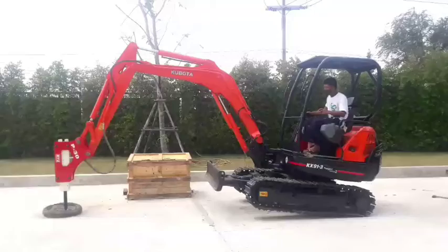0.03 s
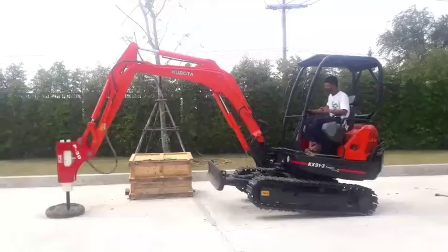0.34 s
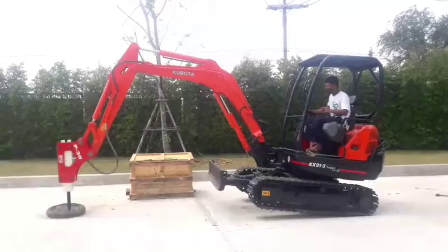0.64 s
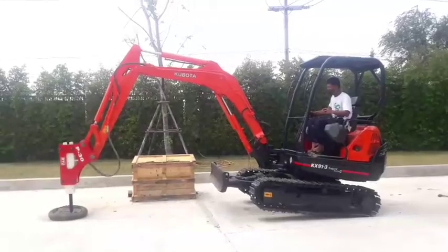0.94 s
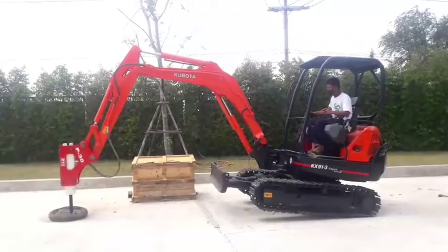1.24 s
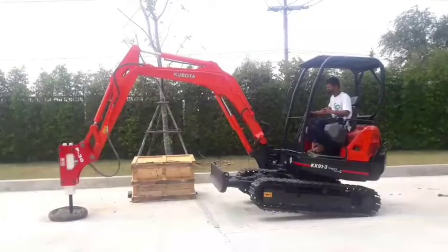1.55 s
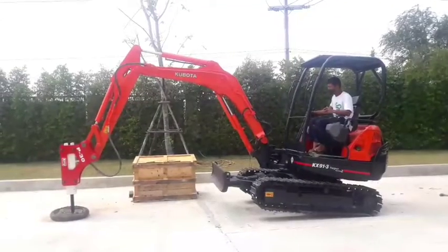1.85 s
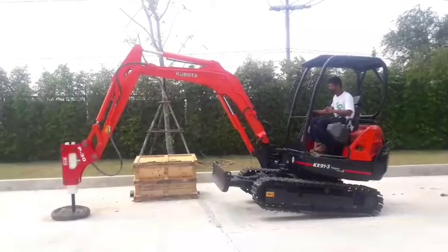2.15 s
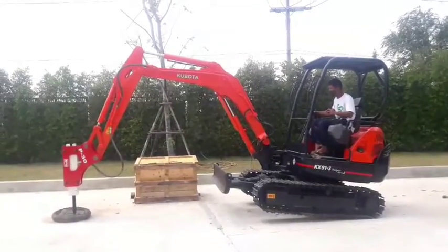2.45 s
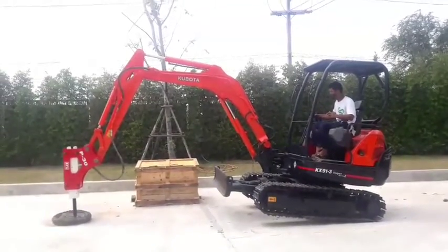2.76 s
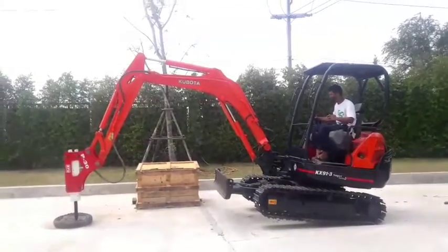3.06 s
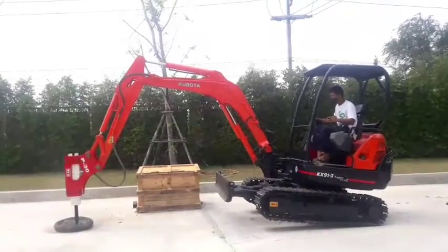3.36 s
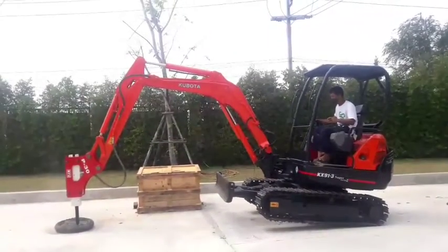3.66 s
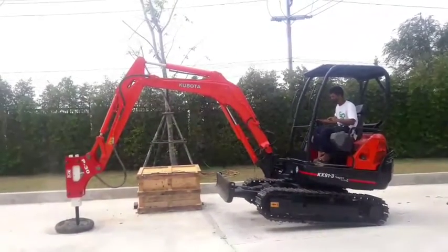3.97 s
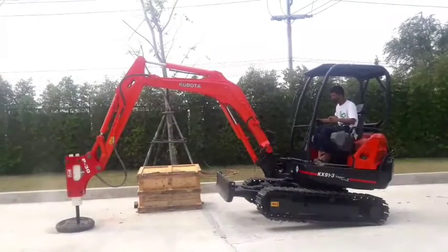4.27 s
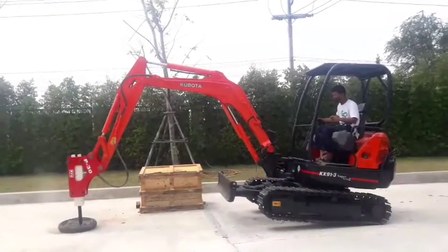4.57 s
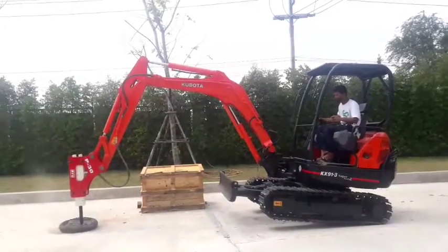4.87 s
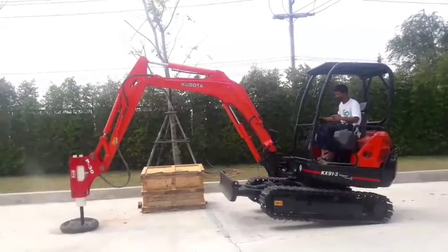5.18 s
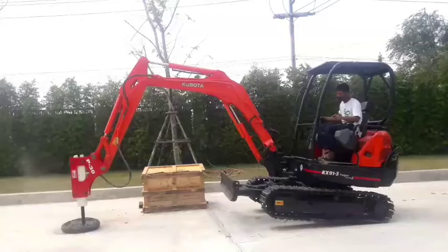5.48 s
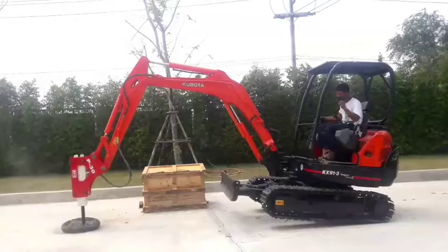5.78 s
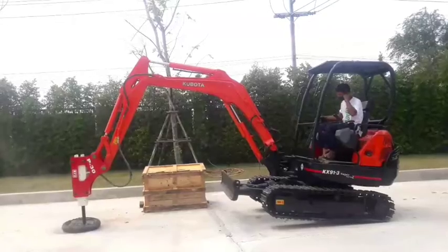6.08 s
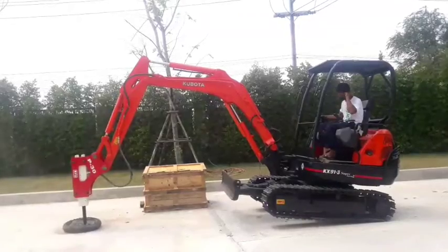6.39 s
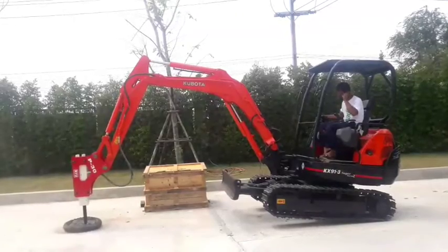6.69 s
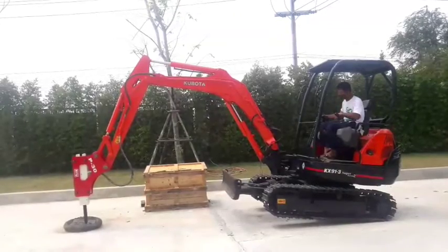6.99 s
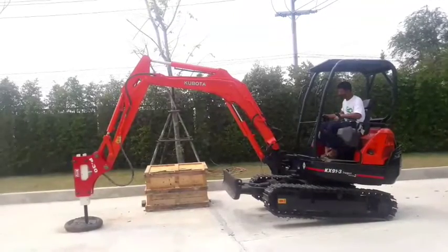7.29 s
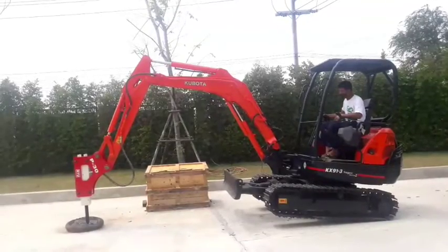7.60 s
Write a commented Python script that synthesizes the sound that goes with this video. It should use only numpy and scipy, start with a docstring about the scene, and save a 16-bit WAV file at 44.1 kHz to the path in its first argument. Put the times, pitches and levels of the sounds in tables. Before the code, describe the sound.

After half a second of silence, a mini excavator's diesel engine fades in with a low, steady rumble. A hydraulic oil hiss dies away by about 1 second, ending with a faint, thin rising squeak. At about 1.7 seconds the hydraulic breaker starts hammering a steel plate on concrete, loud and regular, speeding from roughly nine to fourteen blows a second. Each blow is a sharp crack with a thud and a steely ring, and the boom adds heavy thumps and a hum until about 3.2 seconds. The hammering stops near 3.6 seconds, leaving the engine and a short fading tail. At 4 seconds a second burst starts, quickly reaches full speed and holds until about 7.8 seconds. The engine sounds quieter under the hammering. Everything is heard from several metres away in an outdoor yard, with a quick wall echo and some reverberation.

```python
"""A mini excavator's hydraulic breaker hammers a steel plate on concrete: two bursts, each speeding up
to 14 blows/s. Per blow: valve tick, tip snap, plate thud, crack, ringing housing and chisel.
The boom thumps and hums; a wall echoes the blows and the yard adds a tail.
Behind it a three-cylinder diesel runs, with an oil hiss and a squeak before the first burst.
Automatic gain control turns the engine down while the hammering lasts."""
import sys
import numpy as np
from scipy import signal
from scipy.fft import rfft, irfft, next_fast_len
from scipy.io import wavfile
from scipy.ndimage import uniform_filter1d, minimum_filter1d, map_coordinates

SR = 44100
rng = np.random.default_rng(int(sys.argv[2]) if len(sys.argv) > 2 else 0)


def write(x):
    x = np.atleast_2d(x).T
    wavfile.write(sys.argv[1], SR, np.round(np.clip(x, -1, 1) * 32767).astype(np.int16))


N = 346185

# diesel speed: t/s, firing rate/Hz
FIRING_RATE = [(.5, 60.2), (.75, 59.3), (1.6, 59.3), (3.55, 59), (3.75, 61.3), (3.95, 61.6), (4.3, 59.3)]
# exhaust, block and pump tones: multiple of the three-cylinder cycle, level/dB
ENGINE_ORDERS = [(3, -33.5), (5, -47), (6, -25.5), (7, -40), (9, -32.5), (10, -38), (11, -35.5), (12, -29),
                 (13, -36), (14, -36.5), (15, -33.5), (20, -38), (22, -42), (30, -40), (50, -45.5),
                 (60, -47.5), (70, -46), (80, -46.5)]
# diesel clatter: f/Hz, relative level/dB
CLATTER_SPECTRUM = [(18, -40), (30, -27), (75, -20), (112, -2.5), (161, -6), (239, -3.5), (345, -9),
                    (780, -3.5), (1070, -16), (1390, -14.5), (3670, -32.5), (7470, -37), (9460, -49),
                    (12600, -40), (16000, -55)]
# oil through a valve: f/Hz, relative level/dB
HISS_SPECTRUM = [(300, -24), (1400, -4), (2100, 5), (3200, -9), (4500, -15), (9000, -36), (16000, -44)]
# yard reverberation: f/Hz, relative level/dB
YARD_SPECTRUM = [(60, -37), (150, -20), (300, 4.5), (520, -12.5), (850, 5.5), (1400, -3.5), (2200, -4),
                 (2800, 0), (4000, -8), (6500, -14.5), (10000, -26.5), (16000, -27)]
# wall echo: f/Hz, relative level/dB
WALL_SPECTRUM = [(60, -59), (200, -8.5), (420, 6.5), (550, -7.5), (800, 7), (1100, 8.5), (1400, 1),
                 (1900, 5.5), (2700, 0), (4000, -4.5), (5000, -12.5), (8000, -14), (10000, -25),
                 (16000, -25)]
# boom hum: f/Hz, relative level/dB, t60/s
BOOM_MODES = [(304, 2.5, 0.42), (442, 8, 0.046), (697, 8, 0.069)]
# boom thump: f/Hz, relative level/dB
THUMP_SPECTRUM = [(30, -63), (60, -18), (110, -10), (170, -4), (240, -0.5), (430, -5), (650, -13),
                  (1500, -25.5), (4000, -67)]
# drive into the boom, heavy early in the first burst: t/s, relative level/dB
BOOM_DRIVE = [(1.67, 20), (2.65, 20.5), (3.21, 19), (3.27, 6), (4.15, 13), (4.55, 6), (5.8, 6.5),
              (7.1, 8.5), (7.75, 5)]
# plate on the ground: f/Hz, relative level/dB, t60/s
PLATE_MODES = [(347, -30, 0.11), (457, -9.5, 0.11), (705, -2.5, 0.041), (718, 4.5, 0.056),
               (920, -36, 0.052), (968, 3, 0.078), (1109, 5, 0.033), (1210, -5.5, 0.11), (1570, -38, 0.013)]
# chisel and housing resonances: f/Hz, width/Hz, lift/dB
STEEL_RESONANCES = [(875, 190, 2.5), (1123, 66, 6.5), (1563, 74, 6), (1740, 60, 10), (1944, 103, 12.5),
                    (2206.7, 120, 18.5), (2782, 49, 8.5), (3620, 60, 7), (4480, 65, 9)]
# clear chisel tones: f/Hz, relative level/dB, t60/s
CHISEL_MODES = [(1925, -0.5, 0.072), (2214, 0.5, 0.11)]
# valve tick: f/Hz, relative level/dB
VALVE_SPECTRUM = [(300, -37), (2500, -10), (4500, -18), (5900, 5), (7500, -4), (10000, -6.5), (16000, -0.5)]
# tip biting the plate: f/Hz, relative level/dB
SNAP_SPECTRUM = [(1500, -22), (4000, -3), (6000, 3.5), (9500, -3.5), (12000, -15), (16000, 0)]
# impact crack: f/Hz, relative level/dB
CRACK_SPECTRUM = [(60, -58), (160, -14.5), (300, 1), (600, -5.5), (1500, 2.5), (2200, -11.5), (2700, -5),
                  (3800, -9), (5000, -8), (5800, 0.5), (7000, -17.5), (10000, -23.5), (12000, -15.5),
                  (16000, -22)]
# housing ring: f/Hz, relative level/dB
RING_SPECTRUM = [(60, -24), (300, -41), (520, -24), (750, -3), (1400, -5.5), (2000, -7.5), (3400, -6),
                 (5000, -22.5), (5800, -11.5), (10000, -28), (16000, -26)]
# part of the sound that changes from blow to blow: f/Hz, power share
RANDOM_SHARE = [(300, 0.15), (2000, 0.19), (3200, 0.26), (6000, 0.95), (11000, 0.7)]
# piston speed, one curve per burst, first blow to release: t/s, blow rate/Hz
BURST_RATES = [
    [(1.6697, 8.713), (1.82, 10.045), (2.27, 11.559), (2.52, 13.837), (2.7, 14.068), (3.58, 14.108)],
    [(3.9962, 8.719), (4.2, 13.551), (4.3, 13.418), (4.43, 14.128), (5.2, 14.141), (6.4, 14.131),
     (7.75, 14.166)],
]
# fade-in: t/s, gain
FADE_IN = [(.535, 0), (.58, 0.28), (.64, 0.65), (.74, 0.94)]

AGE_S = np.arange(SR) / SR  # time since a blow
IDLE_FIRING_HZ, REV_DB_PER_HZ = 59.3, 2
BOOM_SCATTER_DB, FORCE_SCATTER_DB, BITE_SCATTER_DB = 1.5, 0.58, 4.9
MAX_WIND_UP_S, WIND_UP_DB_PER_LN = 0.078, 6  # slow blows land harder
PLATE_SAG_PER_DB = 0.018  # share of pitch lost as force rises
FROM_REST_DB = 2.5  # a burst's first blow cracks harder
BAND_LIMIT_HZ = 15900


def amp(db):
    """Decibels to gain."""
    return 10 ** (np.asarray(db) / 20)


def unit_rms(x):
    """x scaled to rms 1."""
    return x / np.sqrt(np.mean(x ** 2) + 1e-20)


def at_hz(rows, hz):
    """(f/Hz, value) rows read on a log axis."""
    row_hz, values = np.transpose(rows)
    return np.interp(np.log(hz + 1), np.log(row_hz), values)


def curve(rows):
    """(t/s, value) rows, one value per sample."""
    return np.interp(np.arange(N) / SR, *np.transpose(rows))


def wobble(rate_hz):
    """Smooth random curve through knots at rate_hz."""
    knots = rng.standard_normal(int(N * rate_hz / SR) + 4)
    return map_coordinates(knots, [np.arange(N) * rate_hz / SR])


def filtered(x, gain_at_hz):
    """Zero-phase filter."""
    size = next_fast_len(N + SR // 2)
    return irfft(rfft(x, size) * gain_at_hz(np.fft.rfftfreq(size, 1 / SR)), size)[:N]


def noise(spectrum):
    """Coloured noise, rms 1."""
    return unit_rms(filtered(rng.standard_normal(N), lambda hz: amp(at_hz(spectrum, hz))))


def convolve(x, response):
    """x through an impulse response."""
    return signal.fftconvolve(x, response)[:N]


def pulses(times_s, db):
    """One impulse per blow."""
    return np.bincount(np.round(times_s * SR).astype(int), amp(db), N)[:N]


def modes(table, t_s):
    """Damped sines with a common start."""
    return sum(amp(db - 60 * t_s / t60_s) * np.sin(2 * np.pi * hz * t_s) for hz, db, t60_s in table)


def swell(delay_s, rise_s, hold_s, t60_s):
    """Rise-hold-decay envelope, energy 1."""
    t_s = AGE_S - delay_s
    shape = np.clip(t_s / rise_s, 0, 1) * amp(-60 * np.maximum(t_s - hold_s, 0) / t60_s)
    return shape / np.linalg.norm(shape)


def steel_response(spectrum, size=8192):
    """Minimum-phase response, energy 1: a broad colour lifted at the steel's resonances."""
    hz = np.fft.rfftfreq(size, 1 / SR)
    lift_db = sum(db / (1 + (2 * (hz - centre_hz) / width_hz) ** 2)
                  for centre_hz, width_hz, db in STEEL_RESONANCES)
    cepstrum = irfft(np.log(amp(at_hz(spectrum, hz) + lift_db)))[:size // 2]
    cepstrum[1:] *= 2
    response = irfft(np.exp(rfft(cepstrum, size)))
    return response / np.linalg.norm(response)


def wave_paths(envelope, passes=6, window_samples=90):
    """Dense cluster of arrivals under an envelope, with an even spectrum."""
    paths = rng.standard_normal(SR) * envelope
    for _ in range(passes):
        white = irfft(np.exp(1j * np.angle(rfft(paths))))
        local_rms = np.sqrt(np.abs(uniform_filter1d(white * white, window_samples)) + 1e-14)
        paths = white * envelope / local_rms
    return paths


def radiate(blows, envelope, spectrum):
    """Every blow takes the same paths; mostly the treble is new each time."""
    repeated = convolve(blows, wave_paths(envelope))
    fresh = rng.standard_normal(N) * np.sqrt(np.abs(convolve(blows ** 2, envelope ** 2)))
    share = lambda hz: np.clip(at_hz(RANDOM_SHARE, hz), 0, 1)
    repeated = filtered(repeated, lambda hz: np.sqrt(1 - share(hz)))
    fresh = filtered(fresh, lambda hz: np.sqrt(share(hz)))
    return convolve(repeated + fresh, steel_response(spectrum))


def diesel():
    """Tones locked to the crankshaft; clatter swells at each firing. Louder when faster."""
    firing_hz = curve(FIRING_RATE)
    firings = np.cumsum(firing_hz * (1 + 0.00267 * wobble(8))) / SR
    cycle_rad = 2 * np.pi * firings / 3
    tones = sum(amp(db + 0.66 * wobble(18)) * np.sin(round(k) * cycle_rad + rng.uniform(0, 2 * np.pi))
                for k, db in ENGINE_ORDERS)
    throb = amp(0.97 * np.cos(2 * np.pi * firings) + 0.46 * wobble(25.8))
    clatter = amp(-26) * unit_rms(throb * noise(CLATTER_SPECTRUM))
    return amp(REV_DB_PER_HZ * (firing_hz - IDLE_FIRING_HZ)) * (np.sqrt(2) * tones + clatter)


def hydraulics():
    """Oil hisses through a valve until the boom takes the load; a thin squeak rises."""
    hiss_db = curve([(.55, -21.5), (.63, -26.5), (.75, -39), (1, -52), (1.6, -64)])
    hiss = amp(hiss_db) * noise(HISS_SPECTRUM)
    squeak_hz = curve([(.9, 4550), (.94, 4800), (.975, 5350)]) * (1 + .012 * wobble(300))
    squeak_db = curve([(.86, -120), (.9, -54), (.96, -47), (.98, -56), (1.02, -120)])
    return hiss + amp(squeak_db) * np.sin(2 * np.pi * np.cumsum(squeak_hz) / SR)


def yard(blows):
    """Long reverberant tail of the yard."""
    return amp(36) * radiate(blows, swell(.04, rise_s=.0082, hold_s=.042, t60_s=.82), YARD_SPECTRUM)


def wall_echo(blows, delay_s=.032):
    """A wall reflects each blow, the chisel tones clearest."""
    slap = radiate(blows, swell(delay_s, rise_s=.00067, hold_s=.0086, t60_s=.047), WALL_SPECTRUM)
    tones = modes(CHISEL_MODES, AGE_S) * (1 - np.exp(-AGE_S / .0055))
    delayed_tones = np.pad(tones, (round(delay_s * SR), 0))
    return amp(39.5) * slap + amp(6) * convolve(blows, delayed_tones)


def boom(times_s, drive_db):
    """Heavy blows shake the boom: a thump, then a hum."""
    heave = pulses(times_s, drive_db)
    thump = radiate(heave, swell(.00335, rise_s=.00156, hold_s=.013, t60_s=.043), THUMP_SPECTRUM)
    hum = convolve(heave, modes(BOOM_MODES, AGE_S) * (1 - np.exp(-AGE_S / .011)))
    return amp(18) * thump + amp(-19) * hum


def plate(times_s, force_db, size=6000):
    """The plate shifts on the concrete, so its modes vary per thud; hard blows sound lower."""
    thuds = np.zeros(N + size)
    hz, db, t60_s = np.transpose(PLATE_MODES)
    for t_s, blow_db in zip(times_s, force_db):
        detune, level_change = rng.standard_normal((2, len(hz)))
        mode_hz = hz * (1 + .008 * detune - PLATE_SAG_PER_DB * blow_db)
        mode_db = db + blow_db + .8 * level_change
        thuds[round(t_s * SR):][:size] += modes(zip(mode_hz, mode_db, t60_s), AGE_S[:size])
    bass_cut = signal.butter(3, 300, 'high', fs=SR, output='sos')  # a small plate radiates little bass
    return signal.sosfilt(bass_cut, thuds[:N])


def strikes(times_s, blows):
    """A valve ticks, the piston lands: tip snap, plate thud, crack, housing ring, chisel ping."""
    wind_up_s = np.minimum(np.diff(times_s, prepend=0), MAX_WIND_UP_S)
    force_db = WIND_UP_DB_PER_LN * np.log(wind_up_s / np.median(wind_up_s))
    from_rest = np.isin(times_s, [burst[0][0] for burst in BURST_RATES])
    ticks = pulses(times_s - .0112, force_db)
    bites = pulses(times_s, force_db + BITE_SCATTER_DB * rng.standard_normal(len(times_s)))
    impacts = pulses(times_s, FROM_REST_DB * from_rest)
    valve = radiate(ticks, swell(0, rise_s=.0011, hold_s=.004, t60_s=.034), VALVE_SPECTRUM)
    snap = radiate(bites, swell(.00085, rise_s=.00045, hold_s=.0011, t60_s=.016), SNAP_SPECTRUM)
    thud = plate(times_s, force_db)
    crack = radiate(impacts, swell(.00059, rise_s=.00084, hold_s=.0092, t60_s=.042), CRACK_SPECTRUM)
    ring = radiate(blows, swell(.011, rise_s=.00153, hold_s=.0099, t60_s=.0215), RING_SPECTRUM)
    chisel = modes(CHISEL_MODES, AGE_S) * swell(.012, rise_s=.0048, hold_s=.011, t60_s=.011)
    return (amp(14.5) * valve + amp(21) * snap + amp(9.5) * thud + amp(38.5) * crack
            + amp(33.5) * ring + amp(48) * convolve(blows, chisel))


def blow_times_s(burst):
    """The piston strikes at once, then after each full stroke."""
    knots_s, rate_hz = np.transpose(burst)
    t_s = np.arange(knots_s[0], knots_s[-1], 1 / SR)
    strokes = np.cumsum(np.interp(t_s, knots_s, rate_hz)) / SR
    return np.interp(np.arange(np.ceil(strokes[-1])), strokes, t_s)


def breaker():
    """Piston blows of near-equal force, with boom, wall echo and yard tail."""
    times_s = np.concatenate([blow_times_s(burst) for burst in BURST_RATES])
    force_spread, boom_spread = rng.standard_normal((len(times_s), 2)).T
    blows = pulses(times_s, FORCE_SCATTER_DB * force_spread)
    drive_db = np.interp(times_s, *np.transpose(BOOM_DRIVE)) + BOOM_SCATTER_DB * boom_spread
    return strikes(times_s, blows) + boom(times_s, drive_db) + wall_echo(blows) + yard(blows)


def scene():
    """The machine from several metres away, mono."""
    return (breaker() + diesel() + hydraulics())[None]


def gain_control(x, ceiling_db, window_s, hold_s):
    """Gain drops at once on loud sound and stays down for hold_s."""
    size, half_hold = int(window_s * SR), int(hold_s * SR) // 2
    rms = np.sqrt(np.abs(uniform_filter1d(x * x, size)) + 1e-12)
    needed_gain = np.minimum(1, amp(ceiling_db) / rms)
    held_gain = minimum_filter1d(needed_gain, 2 * half_hold + 1, origin=half_hold)
    return x * uniform_filter1d(held_gain, size // 2)


def record(dry):
    """Slow gain control, fast limiter, fade-in, band limit."""
    levelled = gain_control(dry[0], ceiling_db=-12.5, window_s=.049, hold_s=.64)
    limited = gain_control(levelled, ceiling_db=-11.5, window_s=.0024, hold_s=.017)
    faded = limited * np.clip(curve(FADE_IN), 0, 1)
    return filtered(faded, lambda hz: hz < BAND_LIMIT_HZ)[None]


dry = scene()
out = record(dry)
write(out)
```